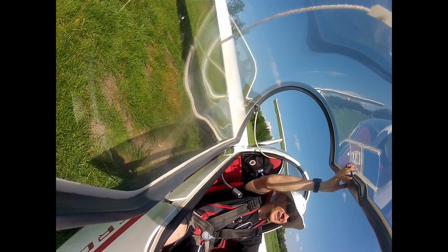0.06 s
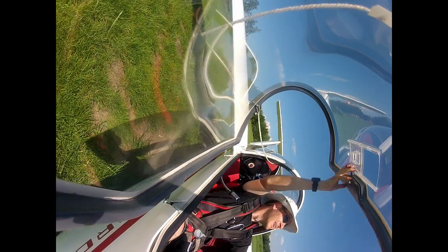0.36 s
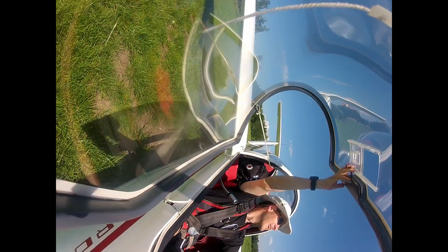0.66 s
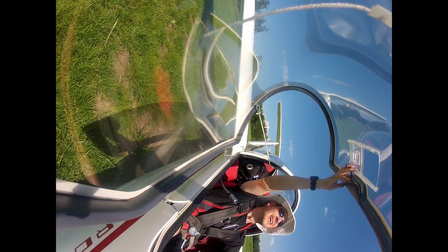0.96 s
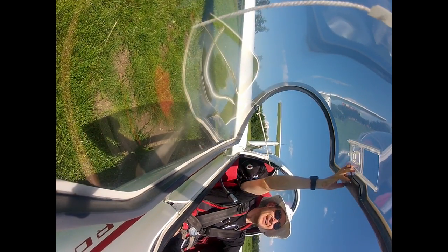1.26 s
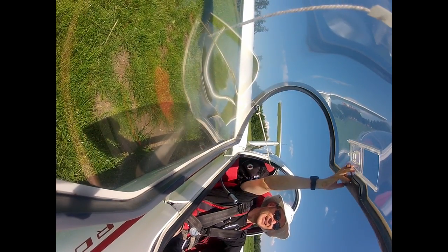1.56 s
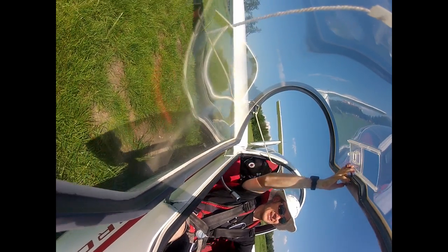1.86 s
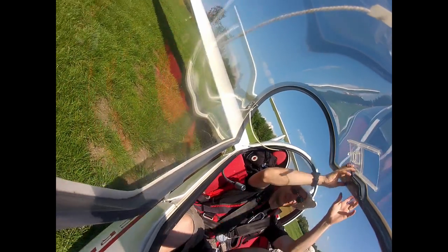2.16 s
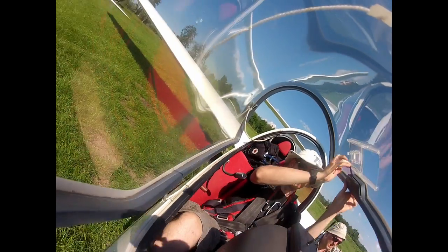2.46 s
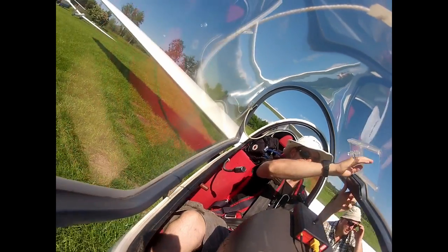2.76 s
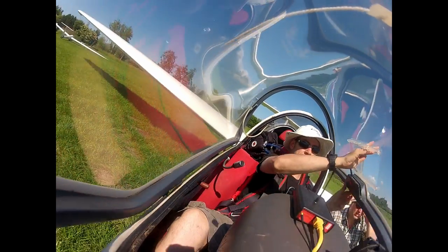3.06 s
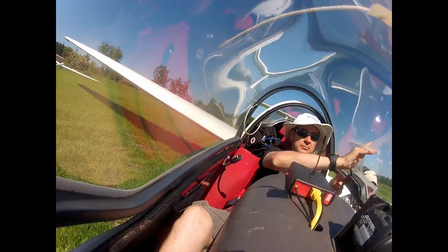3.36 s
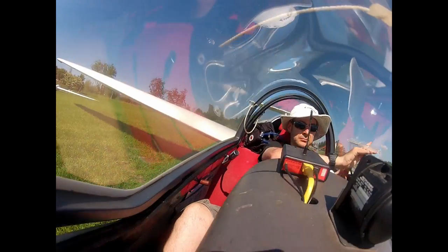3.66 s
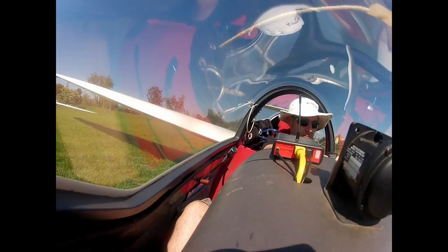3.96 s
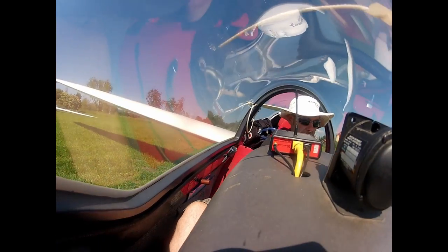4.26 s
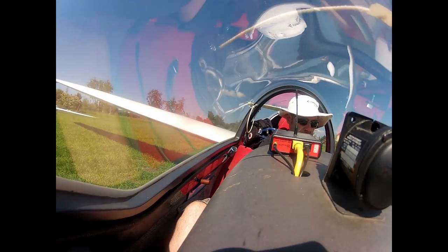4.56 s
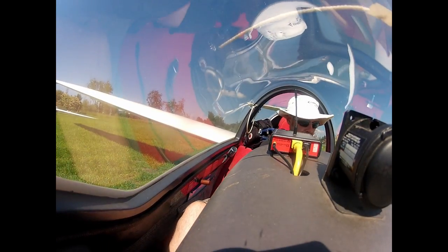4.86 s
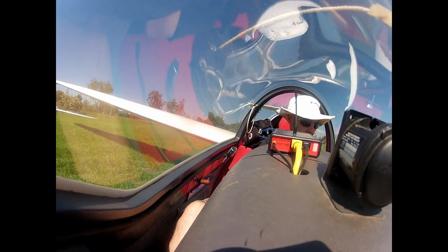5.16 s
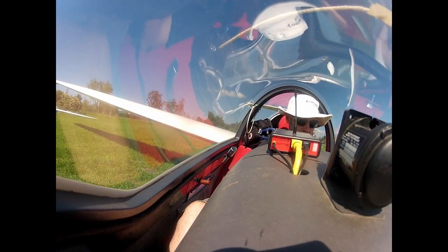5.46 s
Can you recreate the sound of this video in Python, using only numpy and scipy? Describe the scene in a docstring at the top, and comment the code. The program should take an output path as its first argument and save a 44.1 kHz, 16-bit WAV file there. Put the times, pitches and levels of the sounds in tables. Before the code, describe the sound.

A glider canopy creaks shut, thumps and knocks into place, then its latch scrapes and snaps home, over a faint idling piston engine.

```python
"""Closing a glider canopy

Inside a glider on a grass airfield, the canopy is pulled down while a piston engine outside drops to
idle. The frame creaks, ticks and knocks on its way, thumps onto the sill, and the latch scrapes along
and snaps home. A small camera on the canopy hears it all through its mount, adding crunch and fizz."""
import sys
import numpy as np
from scipy import signal
from scipy.fft import rfft, irfft, next_fast_len
from scipy.io import wavfile
from scipy.ndimage import uniform_filter1d, map_coordinates

SR = 44100
rng = np.random.default_rng(int(sys.argv[2]) if len(sys.argv) > 2 else 0)


def digitize_waveform(pressure):
    """Quantize a signal to 16-bit integers and store it at the path in sys.argv[1].

    Rows of a 2-D input are taken as channels; values are limited to [-1, 1].
    """
    field = np.atleast_2d(pressure).T
    bounded = np.clip(field, -1, 1)
    quanta = np.round(bounded * 32767).astype(np.int16)
    wavfile.write(sys.argv[1], SR, quanta)


N = 251766
T = np.arange(N) / SR

# The engine drops to idle, then creeps up: time_s, firing_hz
FIRING_RATE = [(0.14, 97.0), (0.4, 84.5), (0.55, 79.1), (0.7, 68.9), (0.82, 62.2), (1.2, 61.3),
               (1.36, 64.8), (1.55, 63.4), (1.8, 64.1), (2.3, 66.9), (2.6, 66.9), (2.85, 68.7), (3.2, 68.7),
               (3.6, 70.0)]
# The engine's fader, as heard in the cockpit: time_s, level_db
ENGINE_FADER = [(0, -38.5), (.3, -43), (.75, -40.5), (1.4, -39.5), (2.5, -39), (3.1, -38), (3.7, -39.5),
                (4.1, -45.5), (5.7, -59)]
# The exhaust's drone through the shell: freq_hz, gain_db
DRONE_EQ = [(31, -21), (62, 0), (72, 0), (95, -8), (127, -10), (155, -4.5), (172, -5), (192, -14),
            (217, -15), (248, -24), (282, -14), (315, -21), (400, -27), (560, -32), (900, -42)]
# The exhaust's breathy roar: freq_hz, gain_db
PUFF_EQ = [(15, -30.5), (30, -4.5), (60, -7.5), (100, -15.5), (170, 5.5), (230, -0.5), (300, -4.5),
           (380, -13.5), (500, -21.5), (700, -19), (1100, -31), (2000, -49)]
# Soft hiss, for the air and for brushing skin: freq_hz, gain_db
HISS_EQ = [(400, -25), (1000, -10), (1500, -10), (1900, -5), (2300, 0), (2800, 0), (3300, -3), (3900, -8),
           (5000, -50)]
# The fader of the hiss from outside: time_s, level_db
AIR_FADER = [(0, -61.5), (.5, -63), (1.2, -67), (3.1, -67), (3.5, -60.5), (3.78, -61), (4.0, -68),
             (5.2, -75)]
# The frame rubs in its hinges: start_s, length_s, strength_db
CREAKS = [(0.347, 0.082, -47.5), (.48, 0.19, -54.5), (1.673, 0.26, -58), (1.962, 0.4, -55),
          (2.458, 0.061, -53), (2.762, 0.19, -48), (3.029, 0.075, -51), (3.19, 0.38, -50),
          (3.65, 0.18, -48.5)]
# The hinges' hollow voice: freq_hz, gain_db
HINGE_EQ = [(150, -20), (240, -4.5), (380, 3), (480, -4), (600, -1), (850, -12.5), (1100, -15.5),
            (1500, -29), (2200, -50)]
# The canopy shell's modes: pitch_hz, gain_db, t60_s
SHELL_MODES = [(167, -2.5, 0.15), (230, -4, 0.13), (273, -3, 0.12), (328.4, -1.5, 0.078), (377.4, -4, 0.14),
               (422.3, -2.5, 0.047), (535.8, 4.5, 0.022), (669.6, -2, 0.082), (806, -10.5, 0.018),
               (990, -12, 0.025), (1310, -37.5, 0.013)]
# Metal fittings touch: start_s, peak_db, centre_hz, clack_relative_db
CLICKS = [(.1054, -37, 2000, 8), (.336, -37, 2040, 0), (.633, -44, 2140, 1), (1.834, -40.5, 1730, 0.5),
          (1.8821, -31, 2500, -0.5), (2.2, -48, 1770, 15), (2.221, -43, 1700, 8), (2.2425, -31, 1920, 6),
          (3.064, -43, 1710, 12), (3.2131, -29.5, 2710, -8), (3.268, -29.5, 2350, -11),
          (3.285, -36.5, 2760, -10), (3.372, -40, 2870, -13), (3.408, -33, 1880, 3),
          (3.6027, -39.5, 2900, 5), (3.7784, -36.5, 1390, -2), (3.8686, -32.5, 2970, 6),
          (4.1058, -10, 2890, -18), (4.1159, -17.5, 1550, -9), (4.234, -40, 2180, -14),
          (4.2667, -38, 2320, -19), (4.347, -44.5, 2870, -14), (4.4209, -29.5, 1430, -2),
          (4.5047, -23, 2960, -5.5), (4.6064, -19.5, 2900, -11), (4.7206, -27.5, 1650, -19),
          (4.737, -25.5, 1650, 2.5), (4.778, -28.5, 2920, -21), (4.9422, -27, 1600, 0),
          (5.0875, -21, 3230, -13), (5.139, -11, 2250, 4.5)]
# Loose fittings tick as the frame is handled: start_s, end_s, ticks_per_s, peak_db
JIGGLES = [(2.079, 2.365, 18, -50), (2.77, 2.946, 16, -50.5), (3.887, 3.992, 25, -53),
           (4.191, 4.47, 25, -57.5)]
# The fittings' ring: pitch_hz, width_hz, gain_db
METAL_MODES = [(570, 250, 2), (1072, 80, -17.5), (1520, 95, -6), (2355, 700, -3), (2736, 120, 2),
               (3180, 420, 0)]
# The stiff frame's clack: freq_hz, gain_db
CLACK_EQ = [(250, -26), (420, -2), (620, 4), (850, -1.5), (1020, -9), (1230, -12.5), (1450, -17.5),
            (2200, -44)]
# Knocks on the shell: start_s, strength_db, centre_hz, damping_t60_s
KNOCKS = [(.106, -34, 525, 0.23), (0.653, -31.5, 233, 0.14), (.697, -41.5, 705, .1),
          (2.036, -38, 700, 0.066), (2.496, -33.5, 307, 0.3), (2.784, -30, 387, 0.3),
          (2.839, -29.5, 297, 0.13), (2.916, -23, 349, 0.31), (3.199, -25, 334, 0.29),
          (3.261, -20, 259, 0.26), (3.334, -23, 262, 0.11), (3.604, -29.5, 710, 0.16),
          (3.779, -10.5, 700, 0.088), (3.868, -22, 330, 0.42), (4.112, 0, 325, .11),
          (4.187, -13.5, 310, 0.43), (4.234, -21, 234, .23), (4.333, -27.5, 230, 0.33),
          (4.418, -15, 305, 0.21), (4.643, -18, 258, 0.43), (4.717, -10, 218, 0.051),
          (4.735, -8.5, 232, 0.098), (4.756, -15.5, 227, 0.21), (4.846, -21.5, 557, .12),
          (4.891, -12, 410, 0.043), (4.915, -9, 314.5, 0.22), (4.94, -3, 280, 0.15), (5.065, -5, 258, 0.55),
          (5.1375, 1, 430, 0.064), (5.368, -35, 239, .15)]
# The body of the frame's rub and rattle: freq_hz, gain_db
RUB_EQ = [(65, -26), (110, 6.5), (190, -12.5), (240, 8.5), (272, -4), (310, -11.5), (430, -8), (520, -10.5),
          (680, -9.5), (770, -26.5), (860, -24.5), (1000, -33.5), (1300, -69), (1600, -60.5), (2100, -73),
          (3500, -120)]
# The cockpit's reverb time: freq_hz, t60_s
COCKPIT_DECAY = [(100, 0.049), (270, 0.15), (700, 0.11), (3000, 0.042)]
# The whole canopy bounces on its frame: start_s, peak_db, pitch_hz, t60_s
THUMPS = [(2.647, -35, 42.7, 0.34), (2.916, -27, 49.3, 0.34), (3.793, -17.5, 84.6, 0.4),
          (4.112, -1, 66, 0.1), (4.504, -27, 44.2, 0.072), (4.74, -2, 60.4, 0.17),
          (5.138, -9.5, 116, 0.054)]
# Hands shove the frame about on the sill: start_s, length_s, flex_db, rub_db
SHOVES = [(3.788, .18, -29.5, -39.5), (4.162, 0.11, -23, -30.5), (4.26, 0.26, -27.5, -45.5),
          (4.404, 0.041, -16.5, -20), (4.455, 0.11, -28.5, -35), (4.619, 0.194, -22.5, -26),
          (4.731, 0.035, -7.5, -20), (5.302, 0.25, -33.5, -45.5)]
# The flexing frame's rumble: freq_hz, gain_db
FLEX_EQ = [(12, -34.5), (20, -1), (31, -2.5), (44, -14.5), (59, 6), (72, -1.5), (88, -11.5), (115, -35),
           (160, -20.5), (210, -37.5), (350, -120)]
# The crackle of grit: freq_hz, gain_db
GRIT_EQ = [(650, -26), (1100, -1), (1400, -8.5), (1610, -3), (1790, -8), (2070, -0.5), (2690, -8),
           (3110, -2), (3260, -1), (3900, -21), (5070, -53.5), (8580, -120)]
# The panel that groans under the shoves and the latch: pitch_hz, width_hz, gain_db
GROAN_MODE = [(265.3, 61, 3)]
# The latch bolt sings as it scrapes: pitch_hz, width_hz, gain_db
BOLT_MODE = [(3000, 82, 0)]

SILL_S = 3.77  # the frame meets the sill


def amp(db):
    """Decibels to gain."""
    return 10 ** (np.asarray(db) / 20)


def unit(x):
    """x at rms 1."""
    return x / np.sqrt(np.mean(x ** 2) + 1e-20)


def along(points, hz):
    """Read (freq_hz, value) points on a log frequency axis."""
    freqs, values = np.transpose(points)
    return np.interp(np.log(hz + 1), np.log(freqs + 1), values)


def automation(points):
    """Join (time_s, value) points into one value per sample."""
    return np.interp(T, *np.transpose(points))


def wobble(rate):
    """A smooth random curve, rate knots a second."""
    return map_coordinates(rng.standard_normal(int(N * rate / SR) + 4), [T * rate])


def decay(t, t60):
    """A tail that falls 60 dB in t60 seconds."""
    return amp(-60 * t / t60)


def stroke(start, length, rise_s, release_s):
    """Envelope of one movement: it swells, holds and dies away."""
    return np.clip((T - start) / rise_s, 0, 1) * np.exp(-np.maximum(T - start - length, 0) / release_s)


def filtered(x, response):
    """x through a gain given as a function of frequency."""
    size = next_fast_len(len(x) + SR // 10)
    return irfft(rfft(x, size) * response(np.fft.rfftfreq(size, 1 / SR)), size)[:len(x)]


def coloured(x, eq):
    """x through an EQ curve, at rms 1."""
    return unit(filtered(x, lambda hz: amp(along(eq, hz))))


def noise(eq, samples=N):
    """Noise through an EQ curve, at rms 1."""
    return coloured(rng.standard_normal(samples), eq)


def near(hz, centre_hz, slope_db):
    """Gain that falls by slope_db an octave on both sides of a centre."""
    return amp(-slope_db * np.abs(np.log2((hz + 1) / centre_hz)))


def resonances(modes, hz):
    """Response of (pitch_hz, width_hz, gain_db) resonators, alternating in polarity."""
    return sum((-1) ** k * amp(db) * 1j * hz * width / (pitch ** 2 - hz ** 2 + 1j * hz * width)
               for k, (pitch, width, db) in enumerate(modes))


def steady(x, span_s):
    """Ride the gain to even out swells longer than span_s."""
    return x / np.sqrt(np.abs(uniform_filter1d(x ** 2, int(span_s * SR))) + 1e-6)


def slips(rate, spread_db):
    """Stick-slip: tiny kicks of random size, about rate a second."""
    kicks = (rng.random(N) < rate / SR) * rng.choice([-1, 1], N)
    return kicks * amp(spread_db * rng.standard_normal(N))


def through_shell(kicks, width_hz, direct):
    """Kicks ring the hollow shell, with some dry signal blended in."""
    modes = [(pitch, width_hz, 0) for pitch, _, _ in SHELL_MODES]
    return filtered(kicks, lambda hz: direct + resonances(modes, hz))


def add(track, start_s, peak_db, hit):
    """Drop a hit into a track at a set peak level."""
    part = track[round(start_s * SR):][:len(hit)]
    part += amp(peak_db) * hit[:len(part)] / np.abs(hit).max()


def engine():
    """A four-stroke idles: uneven cylinders give half orders, and each firing puffs noise."""
    firing_hz = automation(FIRING_RATE)
    phase = 2 * np.pi * np.cumsum(firing_hz) / SR
    scatter = .08 * wobble(22)  # early and late firings blur the high orders
    drone = np.zeros(N)
    for order in np.arange(1, 19) / 2:
        db = along(DRONE_EQ, order * firing_hz) - 3 * (order % 1 > 0) + 1.2 * wobble(11)
        drone += amp(db) * np.sin(order * (phase + scatter) + rng.uniform(0, 2 * np.pi))
    puffs = unit(noise(PUFF_EQ) * (1 + .5 * np.cos(phase)))
    puff_db = -9 + 5 * np.log2(firing_hz / 65)  # faster means harsher
    return amp(automation(ENGINE_FADER)) * (steady(drone, span_s=.5) + amp(puff_db) * puffs)


def outside_air():
    """A soft hiss flanges as a short echo lengthens, and fades once the canopy is down."""
    hiss = noise(HISS_EQ)
    lag_s = np.interp(T, [0, 3.8], [.0011, .0032])
    echo = map_coordinates(hiss, [(T - lag_s) * SR], order=1)
    return amp(automation(AIR_FADER)) * unit(hiss + .25 * echo)


def hinge_creaks():
    """The hinges creak faintly all the way down: each slip rings the hollow shell."""
    bed = amp(-65.5) * (T < SILL_S)
    swells = sum(amp(db - 1) * stroke(start, length, rise_s=.0083, release_s=.03)
                 for start, length, db in CREAKS)
    hollow = through_shell(slips(rate=420, spread_db=3.5), width_hz=45, direct=.27)
    return (bed + swells) * steady(coloured(hollow, HINGE_EQ), span_s=.16)


def fitting_clicks():
    """Fittings snap together: a sharp contact, a brief metal chatter and a clack of the stiff frame."""
    track, t = np.zeros(N), np.arange(SR // 8) / SR
    ticks = [(rng.uniform(start, end), db + rng.normal(0, 3.9), 2100, 3)  # same columns as CLICKS
             for start, end, rate, db in JIGGLES for _ in range(round(rate * (end - start)))]
    snap = (1 - np.exp(-t / .0024)) * (decay(t, .0096) + amp(-7) * decay(t, .028))
    clack_envelope = (1 - np.exp(-(t / .0044) ** 2)) * decay(t, .027)
    for start, db, centre_hz, clack_db in list(CLICKS) + ticks:
        def metal(hz):
            focus = .38 + near(hz, centre_hz, slope_db=34.5)
            return resonances(METAL_MODES, hz) * focus / (1 + (hz / 4100) ** 8)
        add(track, start, db, filtered(snap * rng.standard_normal(len(t)), metal))
        add(track, start, db + clack_db, clack_envelope * noise(CLACK_EQ, len(t)))
    return track


def shell_knocks():
    """Each knock rings the shell, favouring the modes near its centre, over a short rattle."""
    track, t = np.zeros(N), np.arange(SR // 4) / SR
    hz, mode_db, mode_t60 = np.transpose(SHELL_MODES)[:, :, None]
    for start, db, centre_hz, damping_t60 in KNOCKS:
        gains = amp(mode_db + 4.1 * rng.standard_normal(hz.shape)) * near(hz, centre_hz, slope_db=18.5)
        partials = np.sin(2 * np.pi * (hz * t + rng.random(hz.shape)))
        ring = unit(np.sum(gains * decay(t, mode_t60) * partials, axis=0))
        rattle = unit(noise(RUB_EQ, len(t)) * decay(t, .089))
        envelope = (1 - np.exp(-(t / .0027) ** 2)) * decay(t, damping_t60)
        add(track, start, db + 2.5, envelope * (ring + amp(-4.5) * rattle))
    return track


def cockpit_reverb(x):
    """The cramped cockpit rings on briefly, longest in the low mids."""
    hz, t, bands = signal.stft(rng.standard_normal(SR // 3), SR, nperseg=256)
    tail = signal.istft(bands * decay(t, along(COCKPIT_DECAY, hz)[:, None]), SR, nperseg=256)[1]
    return signal.fftconvolve(x, tail / np.linalg.norm(tail))[:N]


def hand_brush():
    """A short dry whisper of skin on the frame."""
    return amp(-58.5) * stroke(start=2.27, length=.045, rise_s=.025, release_s=.041) * noise(HISS_EQ)


def canopy_thumps():
    """The low end: the canopy's weight bounces for a few slow cycles."""
    track, t = np.zeros(N), np.arange(SR // 3) / SR
    attack = 1 - np.exp(-t / .00087)
    for start, db, hz, t60 in THUMPS:
        add(track, start, db, attack * decay(t, t60) * np.sin(2 * np.pi * hz * t))
    return track


def grinding(flex, rub, grit):
    """Frame against sill, on three envelopes: it flexes, its slips ring the panels, and grit crackles."""
    kicks = slips(rate=1600, spread_db=1)
    hollow = coloured(through_shell(kicks, width_hz=28, direct=.22), RUB_EQ)
    groan = unit(filtered(slips(rate=330, spread_db=4.5),
                          lambda hz: resonances(GROAN_MODE, hz) * near(hz, 170, slope_db=8.5)))
    panels = amp(-3.5) * steady(hollow, span_s=.045) + amp(-4) * steady(groan, span_s=.028)
    rumble = steady(noise(FLEX_EQ), span_s=.069)
    return flex * rumble + rub * panels + grit * coloured(kicks, GRIT_EQ)


def sill_shoves():
    """The frame stirs faintly on the sill and grinds as hands shove it into place."""
    resting = T > SILL_S
    flex, rub = amp(-45) * resting, amp(-49) * resting
    for start, length, flex_db, rub_db in SHOVES:
        push = stroke(start, length, rise_s=.024, release_s=.014)
        flex = np.hypot(flex, amp(flex_db) * push)
        rub = np.hypot(rub, amp(rub_db) * push)
    return grinding(flex, rub, grit=amp(-27.5) * rub)


def latch_slide():
    """The latch bites, draws the frame tight, runs easier as it goes and stops dead."""
    start_s, length_s, draw_rise_s = 4.818, .32, .1
    ease_db_per_s = 12.5
    judder_db = wobble(110)  # the latch catches and slips
    friction = amp(judder_db - ease_db_per_s * np.maximum(T - start_s - draw_rise_s, 0))
    bite = friction * stroke(start_s, length_s, rise_s=.05, release_s=.007)
    draw = friction * stroke(start_s, length_s, draw_rise_s, release_s=.007)
    scrape = unit(filtered(slips(rate=1200, spread_db=2.5), lambda hz: resonances(BOLT_MODE, hz)))
    frame = grinding(flex=amp(-24) * bite, rub=amp(-14) * draw, grit=amp(-44) * bite)
    return amp(-44) * bite * scrape + frame


def scene():
    """A mono mix on both channels; only the knocks and clicks feed the reverb."""
    hits = shell_knocks() + fitting_clicks()
    outside = engine() + outside_air()
    handling = hand_brush() + hinge_creaks() + sill_shoves() + latch_slide() + canopy_thumps()
    mono = outside + handling + hits + amp(-18) * cockpit_reverb(hits)
    return np.array([mono, mono])


def record(dry):
    """The camera flattens peaks and holds each sample, mirroring the sound around 8 kHz as thin fizz."""
    camera_hz, ceiling, hold = 8000, .8, 4
    narrow = filtered(dry.mean(axis=0), lambda hz: 1 / np.sqrt(1 + (hz / 3850) ** 16))
    samples = signal.resample_poly(narrow, camera_hz, SR, window=("kaiser", 8))
    held = np.repeat(np.clip(samples, -ceiling, ceiling), hold)
    steps = signal.resample_poly(held, SR, hold * camera_hz)[:N]
    softened = filtered(steps, lambda hz: 1 / np.sqrt(1 + (hz / 13800) ** 44))
    out = filtered(softened, lambda hz: hz < 15500)
    return np.array([out, out])


dry = scene()
out = record(dry)
digitize_waveform(out)
```